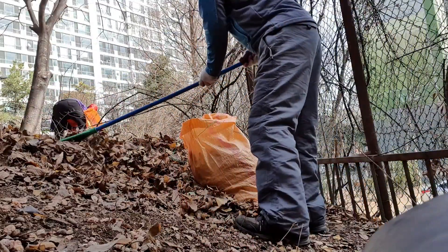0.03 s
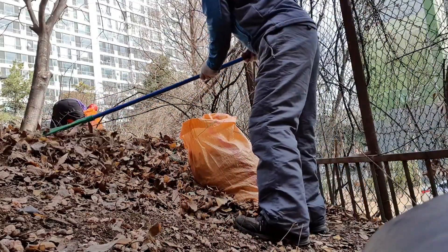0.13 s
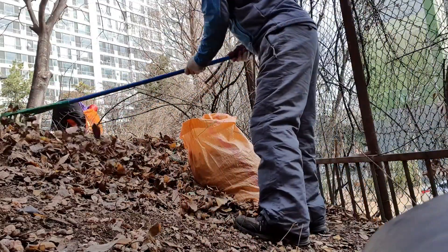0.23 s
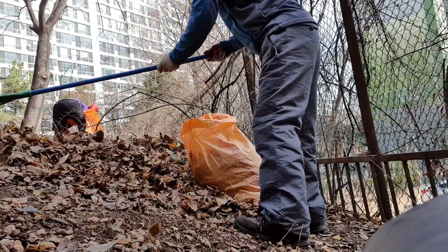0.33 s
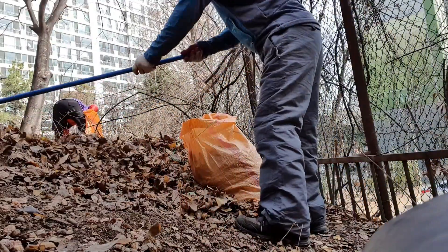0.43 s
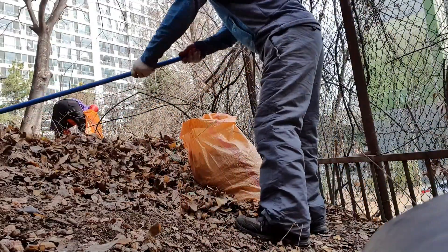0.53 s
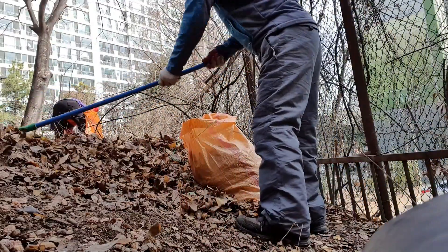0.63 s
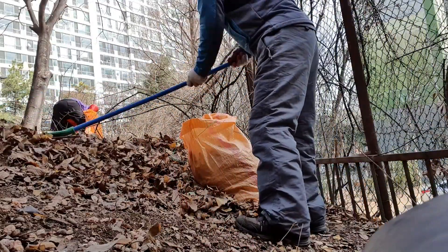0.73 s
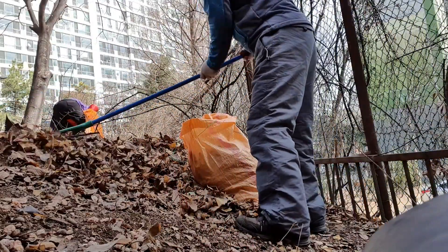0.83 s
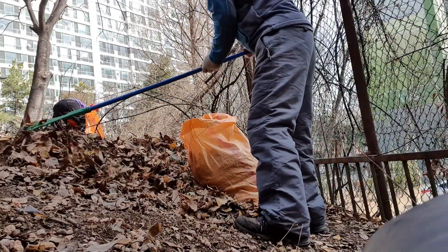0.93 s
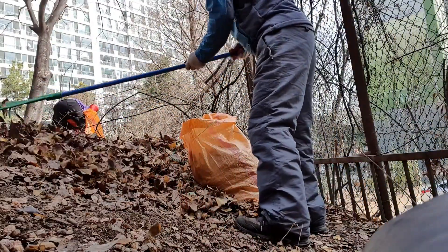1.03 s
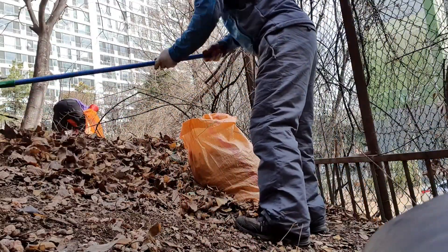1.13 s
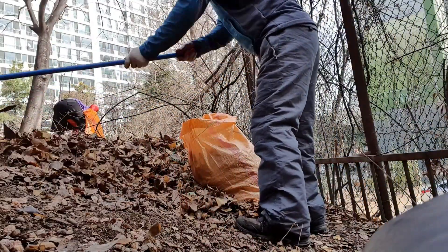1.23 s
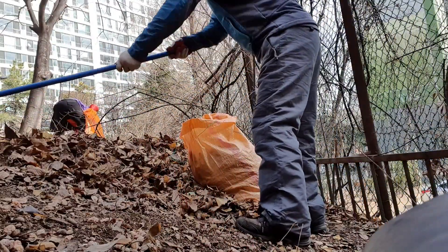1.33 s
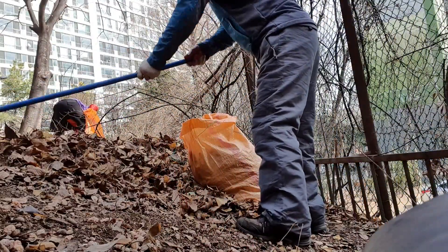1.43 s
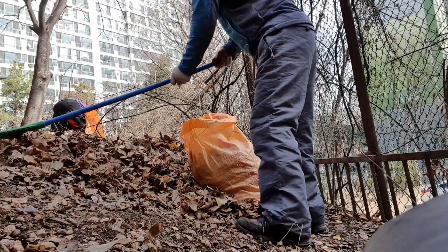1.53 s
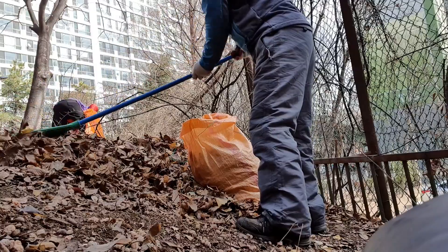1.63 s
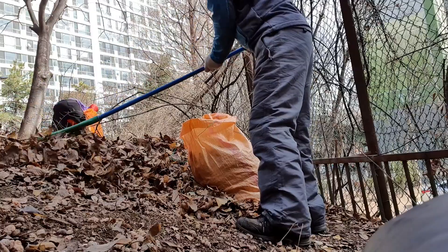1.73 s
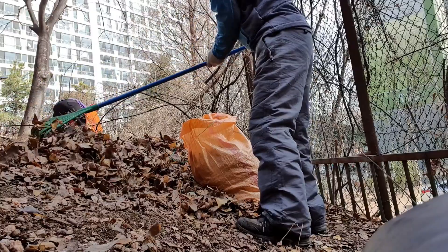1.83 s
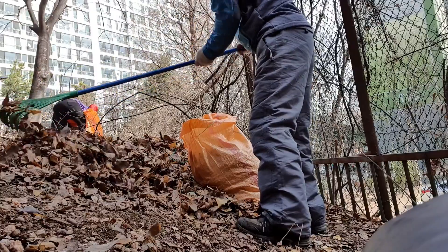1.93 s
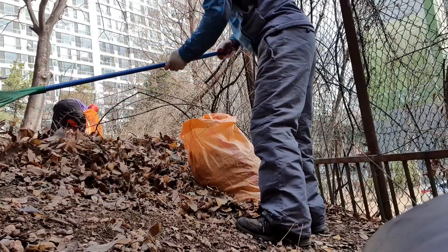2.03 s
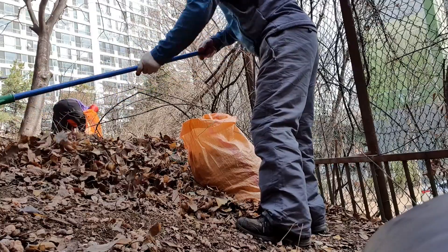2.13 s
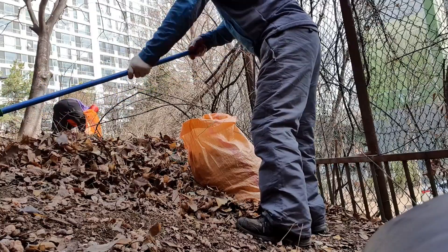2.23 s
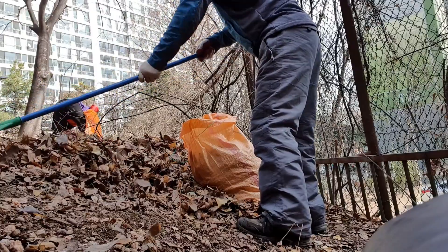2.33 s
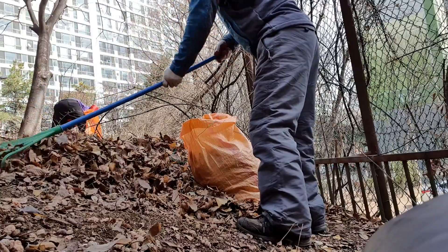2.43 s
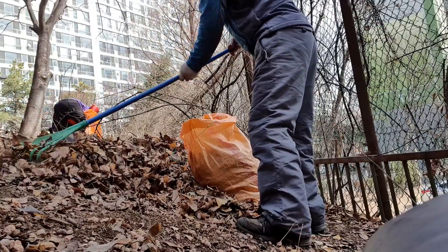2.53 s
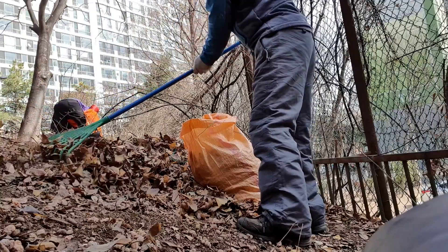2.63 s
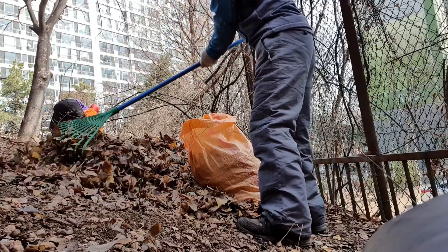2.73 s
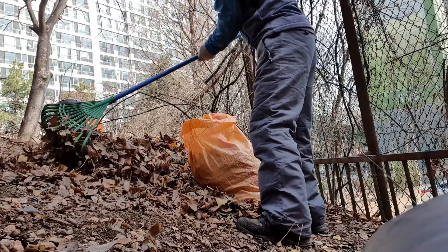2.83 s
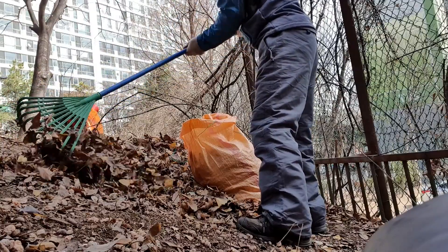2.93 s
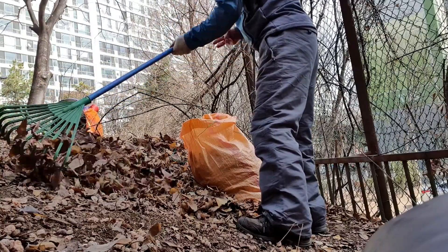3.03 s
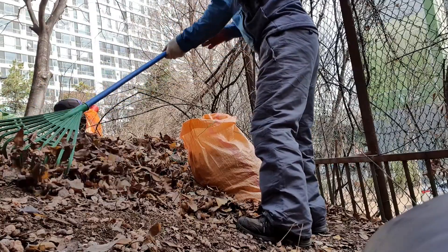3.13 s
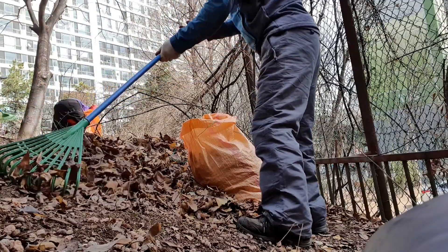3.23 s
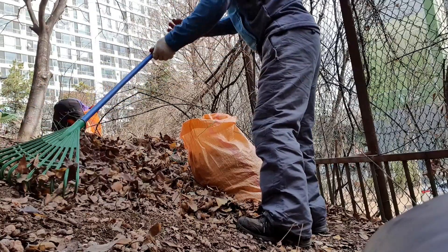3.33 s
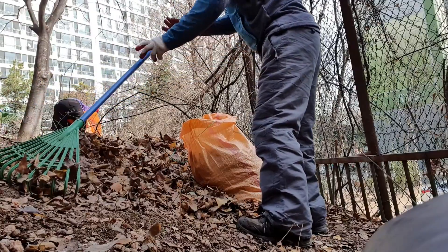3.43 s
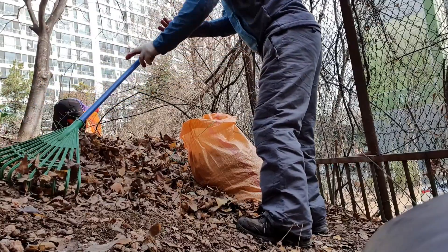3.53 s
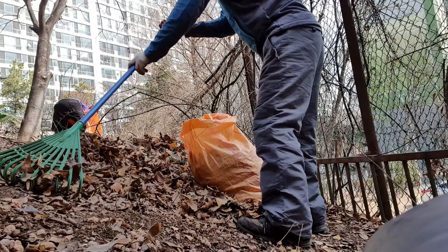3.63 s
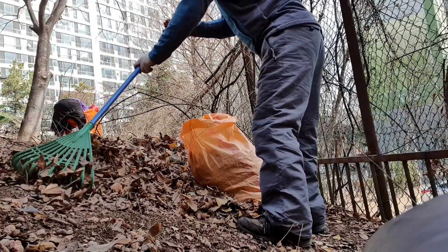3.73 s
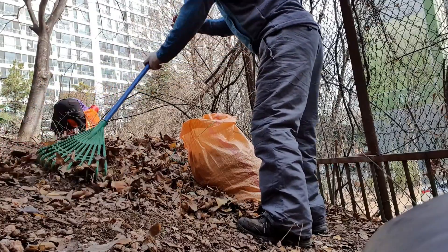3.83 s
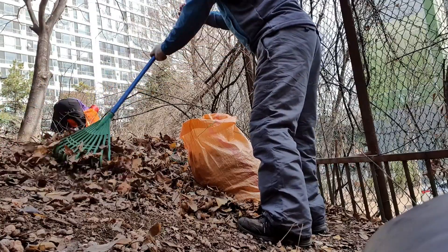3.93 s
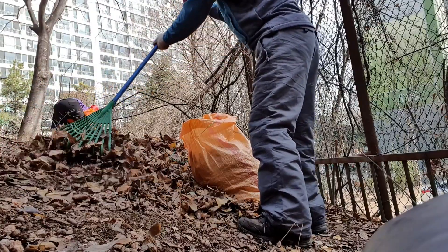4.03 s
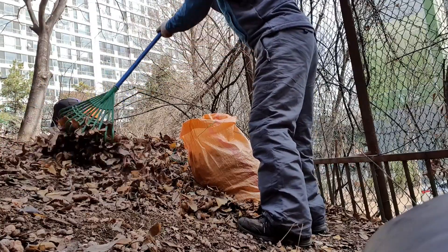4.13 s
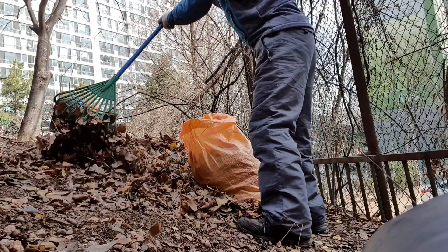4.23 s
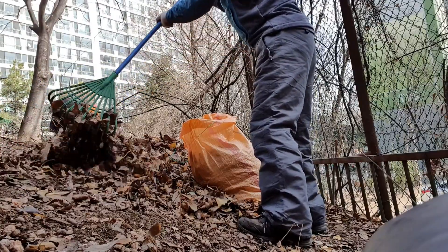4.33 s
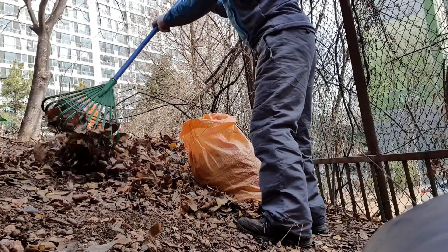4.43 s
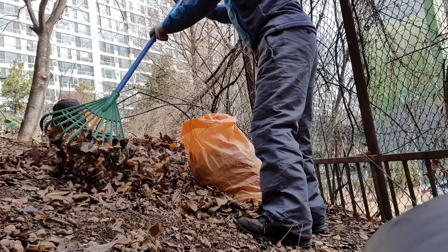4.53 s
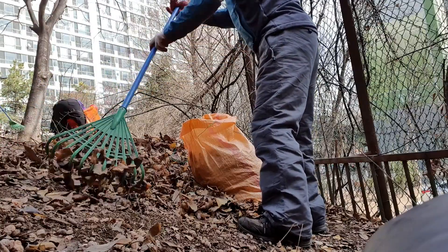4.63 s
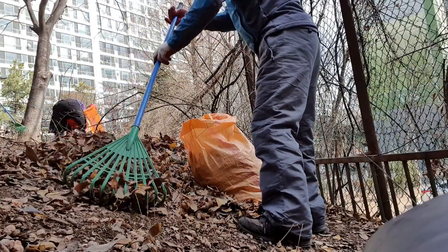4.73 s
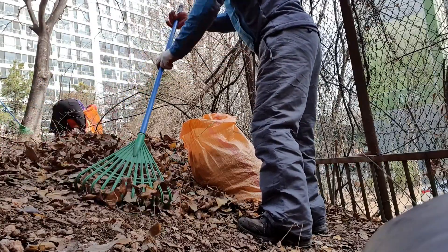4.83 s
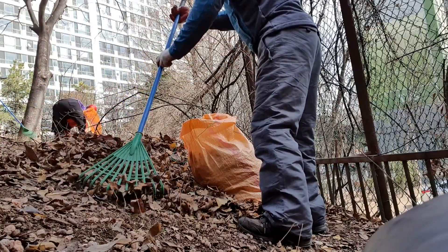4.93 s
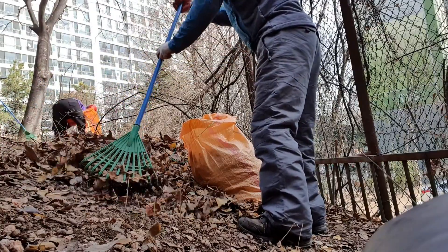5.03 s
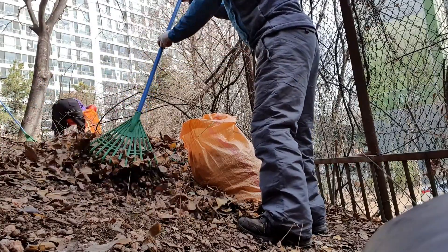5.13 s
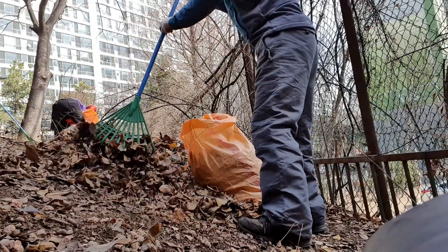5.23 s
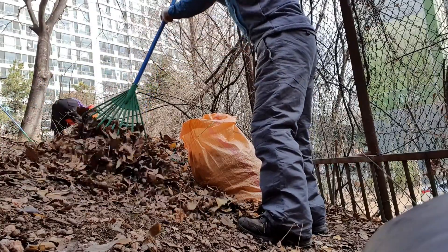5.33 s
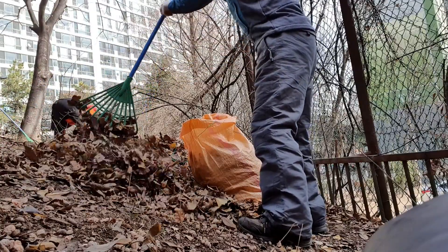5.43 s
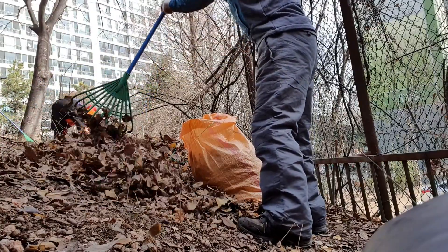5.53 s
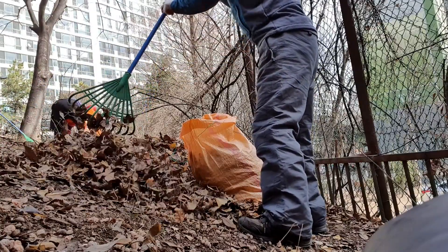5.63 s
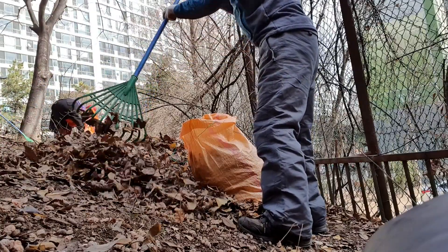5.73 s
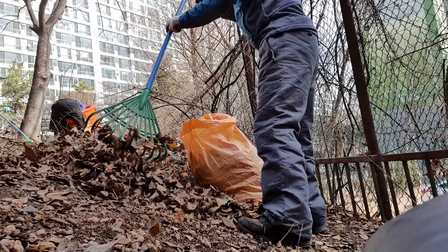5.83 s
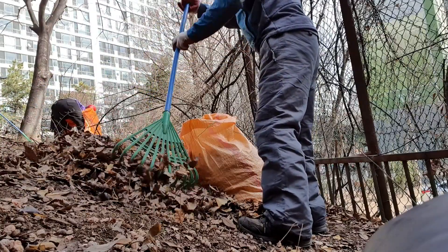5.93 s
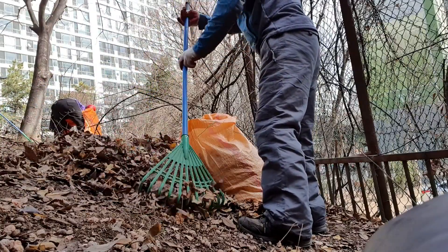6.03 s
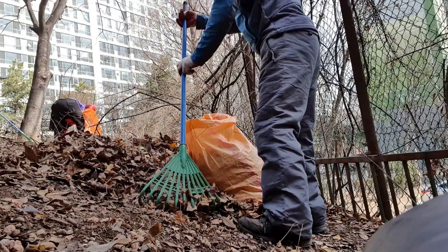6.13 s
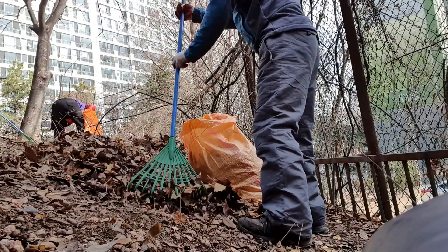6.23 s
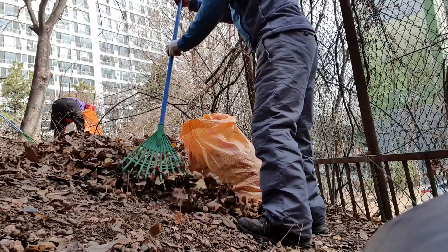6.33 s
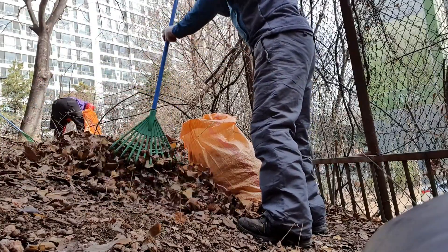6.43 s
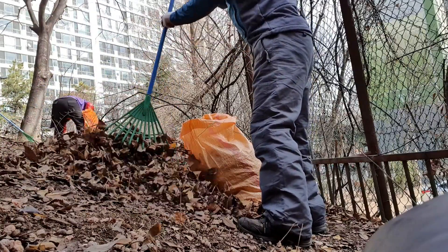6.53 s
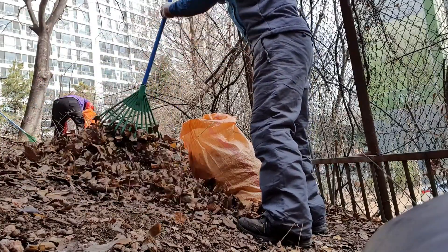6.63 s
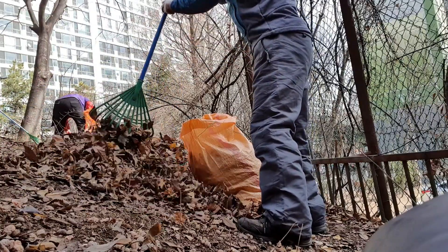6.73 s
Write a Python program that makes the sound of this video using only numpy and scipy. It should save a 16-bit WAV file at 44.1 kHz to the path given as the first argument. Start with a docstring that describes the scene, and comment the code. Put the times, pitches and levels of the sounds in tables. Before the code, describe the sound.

Outdoors, close by and a little to the left, dry leaves crunch and rustle under about seven sweeps of a plastic rake. The teeth tap the ground and scrape the earth, twigs break with sharp little clicks, and thrown leaves patter down after each pull. Underneath, a distant town rumbles steadily and a faraway engine hums, rising slightly in pitch and sinking again.

```python
"""Dry leaves crunch and rustle as a plastic rake sweeps through them on a wooded slope.
Each stroke crushes leaves, snaps twigs and scrapes the soil, and the rake's teeth knock on the ground.
Thrown leaves crackle on as they settle. The crackle is noise chopped into thousands of tiny breaks.
The rake is to the left of a microphone with two openings, one for each ear.
A town rumbles underneath, and a far engine drones."""
import sys
import numpy as np
from scipy import signal
from scipy.io import wavfile
from scipy.ndimage import uniform_filter1d

SR = 44100
rng = np.random.default_rng(int(sys.argv[2]) if len(sys.argv) > 2 else 0)


def store_pcm(level_fs):
    """Save levels as 16-bit WAV."""
    pcm = np.round(np.clip(level_fs, -1, 1) * 32767).astype(np.int16)
    wavfile.write(sys.argv[1], SR, np.atleast_2d(pcm).T)


N = 299680


def amp(db):
    """Turn decibels into a number to multiply a sound by."""
    return 10 ** (np.asarray(db) / 20)


def unit_level(x):
    """Scale a signal so that its average power is 1."""
    return x / np.sqrt(np.mean(x ** 2) + 1e-20)


def look_up(table, hz):
    """Read a table's columns at these frequencies, sliding smoothly between its rows."""
    row_hz, *columns = np.transpose(table)
    return [np.interp(np.log(hz + 1), np.log(row_hz + 1), column)[:, None] for column in columns]


def patches(shape, bands, frames):
    """Random highs and lows, smoothed over this many frequency bands and time frames."""
    noise = rng.standard_normal(shape[::-1]).T
    return unit_level(uniform_filter1d(uniform_filter1d(noise, bands, axis=0), frames, axis=1))


# Each row: frequency in Hz, relative level of the rumble in dB.
TOWN_TONE = [(25, -60), (36, -19.5), (45, -2.5), (62, -4), (100, -7), (150, -10.5), (210, -6.5),
             (330, -17.5), (480, -21.5), (900, -28.5), (1250, -38), (2000, -41), (4000, -65), (15500, -53)]
# Each row: frequency in Hz, how alike left and right are (1 the same, 0 unrelated, -1 opposite).
TOWN_LIKENESS = [(60, 1), (200, 0.84), (400, 0.55), (700, -0.074), (1050, -0.75), (1500, -0.1), (2500, 1)]
def town_rumble():
    """Far traffic and air: deep noise that swells slightly, its bass almost the same in both ears."""
    level_db, waver_db = -35, .6
    frames, hz = N // 512 + 5, np.fft.rfftfreq(2048, 1 / SR)
    a, b, c, d = rng.standard_normal((frames, 1025, 4)).T
    alike = look_up(TOWN_LIKENESS, hz)[0]
    left = a + 1j * b
    right = alike * left + np.sqrt(1 - alike ** 2) * (c + 1j * d)
    waver = patches(left.shape, 8, 12) + patches((1, frames), 1, 30)
    spectra = np.array([left, right]) * amp(look_up(TOWN_TONE, hz)[0] + waver_db * waver)
    rumble = signal.istft(spectra, nperseg=2048, noverlap=1536)[1][:, :N]
    return amp(level_db) * unit_level(rumble)


# Each row: time in seconds, the engine's pitch in Hz, level in dB.
ENGINE_PATH = [(0, 54.5, -36), (.35, 43.7, -40), (.8, 55.4, -45), (1.85, 51.06, -52), (2.1, 51.7, -47),
               (2.9, 58.2, -34.5), (3.2, 58.54, -44), (3.37, 60.64, -31), (3.92, 60.44, -39.5),
               (4.05, 60, -32), (4.3, 57.04, -34), (4.65, 51.94, -45.5), (5.4, 51.2, -33.5),
               (5.7, 50.2, -48), (6.25, 49.5, -38), (6.5, 43.9, -45.5), (6.8, 44, -54)]
def engine_drone():
    """A far engine speeds up and slows again: one low tone that wavers a little in pitch."""
    times, hz, db = np.transpose(ENGINE_PATH)
    t = np.arange(N) / SR
    slow_noise = uniform_filter1d(uniform_filter1d(rng.standard_normal(N), 2500), 2500)
    pitch_hz = np.interp(t, times, hz) + 1.57 * unit_level(slow_noise)
    cycles = np.cumsum(pitch_hz) / SR
    return np.sqrt(2) * amp(np.interp(t, times, db)) * np.sin(2 * np.pi * cycles)


# How the leaves sound at each opening. Each row: frequency in Hz, left level in dB,
# right level in dB, then the left and right changes in dB when the rake is far off.
MIC_TONE = [(40, -34, -30, 0, 0), (120, -9, -1, -1, 9), (300, -4.5, -10, 1, -1.5),
            (550, -8.5, -0.5, 1.5, -2.5), (1070, -19, -21.5, -2.5, 7), (1257, -4.5, -11.5, -6.5, -7),
            (1650, -6, -18, 2.5, 1), (2155, -3, -8, -2.5, -2), (2760, -22.5, -12.5, 9.5, 4),
            (3240, -8.5, -15, -2, 4), (3730, -3.5, -11, -3.5, -3), (4650, -11, -10, 3, 0.5),
            (5800, -6, -7, -3.5, -1), (6350, -9, -13, 1, 0), (6900, -10.5, -14.5, 0.5, 0.5),
            (7250, -8, -8.5, 2.5, -6), (7550, -7.5, -8.5, -4, -1), (8200, -9.5, -11.5, -0.5, 1),
            (9200, -9, -13.5, 3.5, -3), (10240, -7, -11.5, -2, 0.5), (10870, -5.5, -9.5, 2.5, -1),
            (12000, -2, -9.5, -2.5, 0), (13000, -4, -5, 2, -2), (13500, -5, -9, -1, 0),
            (14000, -2.5, -10, 0.5, 0), (14550, -1.5, -9, -3, 0), (14950, -4, -6, -4, -3),
            (15400, 0, -7, -1, -5.5)]
# Each row: frequency in Hz, how alike the sides are (0 to 1), extra phase on the right in radians.
MIC_LIKENESS = [(500, .97, 1.0), (900, .9, 1.0), (1120, .3, 2.0), (1350, .72, 3.7), (1700, .62, 3.9),
                (2400, .5, 5.5), (3200, .27, 5.3), (5000, .2, 6.3), (15000, .17, 6.3)]
# The rake works its way closer. Each row: time in seconds, distance (0 is near, about 1 is far).
RAKE_DISTANCE = [(0, 0.65), (1.3, 0.76), (1.6, 1.1), (2.6, 0.7), (3.5, 0.3), (6.8, 0)]
def at_microphone(sound, other, tone_db=None):
    """Colour a sound for both openings; the right mixes in `other` where the sides are less alike."""
    right_lag_s = .00059  # the rake is nearer the left opening
    echo_s, echo_gain = .00054, -.17  # the left also hears an echo off the microphone's case
    hz, t, (main, spare) = signal.stft([sound, other], SR, nperseg=256, noverlap=192)
    left_db, right_db, far_left_db, far_right_db = look_up(MIC_TONE, hz)
    distance = np.interp(t, *np.transpose(RAKE_DISTANCE))
    alike, phase = look_up(MIC_LIKENESS, hz)
    turn = 2j * np.pi * hz[:, None]  # multiplying by exp(-turn * seconds) delays a sound
    left = main * (1 + echo_gain * np.exp(-turn * echo_s))
    right = alike * main * np.exp(1j * phase - turn * right_lag_s) + np.sqrt(1 - alike ** 2) * spare
    left *= amp(left_db + distance * far_left_db)
    right *= amp(right_db + distance * far_right_db)
    spectra = np.array([left, right]) * (1 if tone_db is None else amp(tone_db(hz, t)))
    return signal.istft(spectra, SR, nperseg=256, noverlap=192)[1][:, :N]


# The tones of the rake's teeth. Each row: pitch in Hz, relative level in dB, seconds to fade by 60 dB.
TOOTH_TONES = [(420, -9, .018), (600, -2, .02), (790, -1, .014), (1250, 0, .009), (1800, 0, .009),
               (2500, 0, .007), (3500, -3, .008), (5000, -8, .007)]
# Each row: start in seconds, relative level in dB, brightness in dB per octave.
LANDINGS = [(1.4757, -26, -8), (2.4682, -22, 0), (2.498, -37, 6), (2.516, -22, 2), (3.383, -36, 0),
            (3.6963, -25, -5), (3.742, -36, 3), (3.781, -33, 3), (3.83, -31, 3), (3.988, -27, -5),
            (5.0, -33, 2), (6.224, -35, 2)]
def rake_knocks():
    """The plastic teeth ring briefly as they land; harder ground brings out their higher tones."""
    t, knocks = np.arange(2048) / SR, np.zeros(N)
    for start_s, level_db, brightness in LANDINGS:
        at = round(start_s * SR)
        for hz, tone_db, fade_s in TOOTH_TONES:
            start_db = level_db + tone_db + brightness * np.log2(hz / 1000)
            knocks[at:at + len(t)] += amp(start_db - 60 * t / fade_s) * np.sin(2 * np.pi * hz * t)
    return at_microphone(knocks, knocks)


# Each row: start in seconds, relative level in dB, pitch of the brightest part in Hz.
TWIG_SNAPS = [(.634, -23, 11000), (.7208, -27, 8000), (1.4405, -33, 6000), (1.475, -27, 10000),
              (1.5614, -22, 12000), (1.5748, -13, 11000), (1.5838, -13, 10000), (2.3742, -27, 13000),
              (2.3782, -16, 14000), (2.384, -17, 9000), (1.6232, -15, 12000), (1.6313, -16, 9000),
              (2.4548, -27, 10000), (2.499, -20, 11000), (2.5155, -15, 9000), (2.508, -20, 10000),
              (2.541, -18, 11000), (2.612, -20, 9000), (2.6775, -16, 11000), (2.8014, -25, 10000),
              (2.9404, -29, 10000), (3.4085, -22, 12000), (3.4105, -24, 3600), (3.417, -27, 4200),
              (3.4244, -21, 11000), (3.8104, -14.5, 11500), (3.8155, -16, 9500), (3.958, -18, 12000),
              (3.971, -20, 9000), (4.3069, -23, 11000), (5.004, -21, 8500), (5.021, -21, 7000),
              (5.075, -19, 13000), (5.096, -22, 4500), (5.146, -23, 2500), (5.1185, -19, 10000),
              (6.1644, -35, 13000), (6.224, -25, 6000), (6.3055, -18, 11000)]
def twig_snaps():
    """A twig or leaf breaks with a sudden burst of noise around its own pitch."""
    fade_s = .013  # time to fade by 60 dB
    t, snaps = np.arange(4096) / SR, np.zeros((2, N))
    for start_s, db, hz in TWIG_SNAPS:
        band = signal.butter(2, [.6 * hz, min(1.6 * hz, 20000)], "band", fs=SR)
        burst = unit_level(signal.lfilter(*band, rng.standard_normal((2, len(t)))))
        at = round(start_s * SR)
        snaps[:, at:at + len(t)] += burst * amp(db - 60 * t / fade_s)
    return at_microphone(*snaps)


def tiny_breaks(per_second, spread_db, fade_s):
    """The loudness of many small breaks: sudden starts of uneven size that die away fast."""
    sizes = amp(spread_db * np.minimum(rng.exponential(1, N), 5))
    starts = rng.random(N) < per_second / SR
    decay = 10 ** (-6 / (fade_s * SR))
    power = signal.lfilter([1], [1, -decay], sizes ** 2 * starts)
    return unit_level(np.sqrt(power + 1e-9))


def swell(t, start_s, rise_s, hold_s, db, fall_db_per_s):
    """The power of one swell: it climbs 19.5 dB during its rise, holds, then fades steadily."""
    climb_db = 19.5 * np.minimum((t - start_s) / rise_s - 1, 0)
    fall_db = fall_db_per_s * np.maximum(t - start_s - rise_s - hold_s, 0)
    return amp(db + climb_db - fall_db) ** 2


# The teeth scrape the soil. Each row: start, rise and hold in seconds, relative level in dB.
SOIL_SCRAPES = [(-.3, .08, 0.17, -23.5), (0.696, 0.08, 0.18, -28), (1.547, 0.069, 0.17, -25.5),
                (2.451, 0.1, 0.22, -27), (3.8, 0.14, 0.1, -26.5), (4.92, 0.11, 0.18, -25.5),
                (6.215, 0.044, 0.24, -28)]
# The rake digs in and drags. Each row: start, rise and hold in seconds, crackle level in dB,
# how much louder the heap is than the crackle in dB.
RAKE_PULLS = [(-.3, 0.081, 0.15, -39, 13.5), (0.687, 0.048, 0.17, -35.5, 5.5), (1.473, .005, .01, -36.5, 0),
              (1.521, 0.054, 0.22, -27.5, -2.5), (2.456, .005, 0.018, -37, -7),
              (2.448, 0.056, 0.18, -27.5, 0.5), (3.736, 0.14, 0.15, -26.5, 0),
              (4.896, 0.12, 0.14, -28, 2.5), (6.214, 0.022, 0.27, -30.5, 3)]
# A handful of leaves is crushed. Each row: time of the peak in seconds, crackle level in dB,
# how much louder the heap is than the crackle in dB.
LEAF_CRUNCHES = [(.645, -38, 3), (.79, -28, -5), (1.575, -27, -18), (1.63, -18.5, -5.5), (1.72, -26, 0),
                 (1.796, -31.5, 5.5), (2.311, -41, 2), (2.39, -40, 1), (2.556, -21, -21), (3.418, -33, 4),
                 (3.816, -26.5, -8), (3.871, -30, -22), (3.96, -23, -4), (4.929, -32, 2.5),
                 (5.018, -27, -2), (5.137, -26.5, 2), (6.17, -41, -12), (6.288, -29.5, 2)]
# Thrown leaves rain down. Each row: start, rise and hold in seconds, crackle level in dB.
LEAF_SHOWERS = [(-.2, 0.18, 0.44, -36.5), (0.61, 0.43, 0.12, -36), (1.05, .2, .08, -42),
                (1.699, 0.27, 0.25, -38), (2.603, 0.32, 0.15, -34.5), (2.905, 0.29, 0.0092, -27.5),
                (3.28, 0.11, 0.0092, -36), (3.992, 0.26, 0.016, -34), (4.08, 0.56, 0.018, -28),
                (4.6, 0.22, 0.087, -34.5), (5.1, 0.27, 0.079, -30.5), (5.298, .36, 0.094, -30),
                (6.298, 0.25, 0.26, -35)]
def rake_strokes(t):
    """Add up the power over time of the fine crackle, the deeper heap of leaves and the soil scrape."""
    crackle = heap = amp(-63) ** 2  # the leaves never fall quite silent
    scrape = sum(swell(t, *row, fall_db_per_s=24) for row in SOIL_SCRAPES)
    for *timing, db, heap_db in RAKE_PULLS:
        crackle = crackle + swell(t, *timing, db, fall_db_per_s=43)
        heap = heap + swell(t, *timing, db + heap_db, fall_db_per_s=45)
    crunch_rise_s = .028
    for peak_s, db, heap_db in LEAF_CRUNCHES:
        crunch = swell(t, peak_s - crunch_rise_s, crunch_rise_s, 0, db, fall_db_per_s=310)
        crackle += crunch
        heap += crunch * amp(heap_db) ** 2
    showers = sum(swell(t, *row, fall_db_per_s=50.3) for row in LEAF_SHOWERS)
    return crackle + showers, heap + showers * amp(-4) ** 2, scrape


def raked_leaves():
    """Leaves break in a fine, clumpy crackle; the heap and the soil under them add the lower sounds."""
    heap_below_hz, scrape_below_hz = 4300, 850
    fine = tiny_breaks(per_second=7000, spread_db=.65, fade_s=.006)
    clumps = tiny_breaks(per_second=110, spread_db=4.2, fade_s=.007)
    noise = fine * (1 + .08 * clumps) * rng.standard_normal((2, N))

    def tone_db(hz, t):
        """How much the heap and the soil change each frequency, with a random flicker on top."""
        crackle, heap, scrape = rake_strokes(t)
        heap_share = 1 / (1 + (hz[:, None] / heap_below_hz) ** 2.6)
        soil = scrape / crackle / (1 + (hz[:, None] / scrape_below_hz) ** 6)
        flicker_db = patches(soil.shape, 8, 8) + 1.3 * patches(soil.shape, 2, 40)
        return 10 * np.log10((heap / crackle) ** heap_share + soil) + flicker_db

    rustle = unit_level(at_microphone(*noise, tone_db))
    coarse_t = np.arange(0, N + 16, 16) / SR
    loudness = np.sqrt(rake_strokes(coarse_t)[0])
    return rustle * np.interp(np.arange(N) / SR, coarse_t, loudness)


def scene():
    """The raking close by, over the far town and engine."""
    return raked_leaves() + twig_snaps() + rake_knocks() + town_rumble() + engine_drone()


def record(dry):
    """The deepest bass is taken away, and the treble ends at the recorder's cut-off."""
    lowest_hz, highest_hz = 37.4, 15745
    bass_cut = signal.butter(4, lowest_hz, "high", fs=SR, output="sos")
    treble_cut = signal.firwin(2047, highest_hz, window=("kaiser", 9), fs=SR)
    return signal.oaconvolve(signal.sosfilt(bass_cut, dry), treble_cut[None], "same")


dry = scene()
out = record(dry)
store_pcm(out)
```